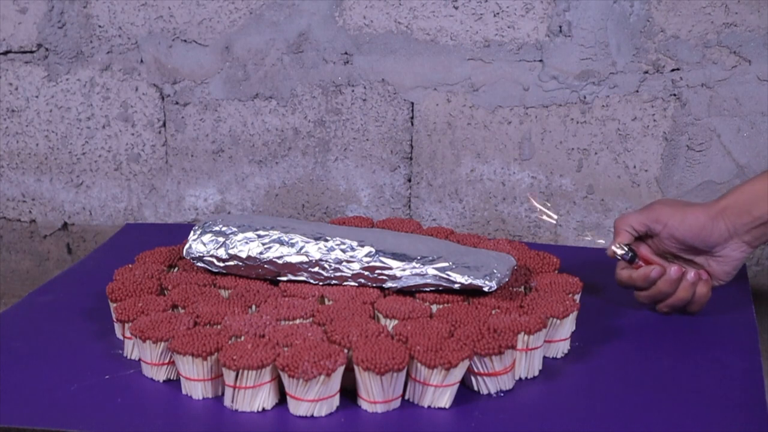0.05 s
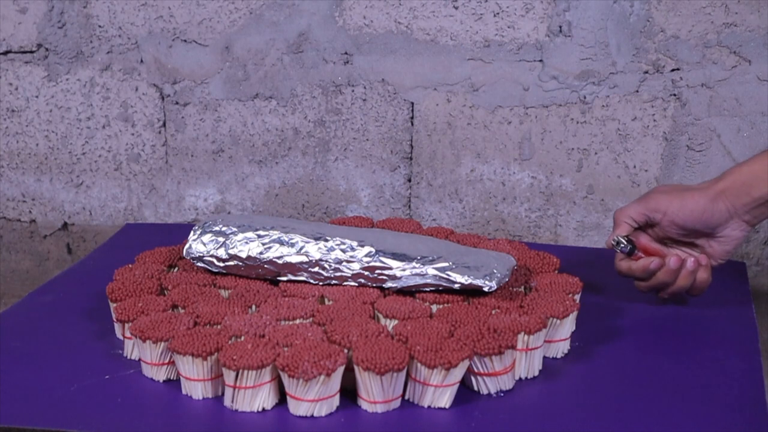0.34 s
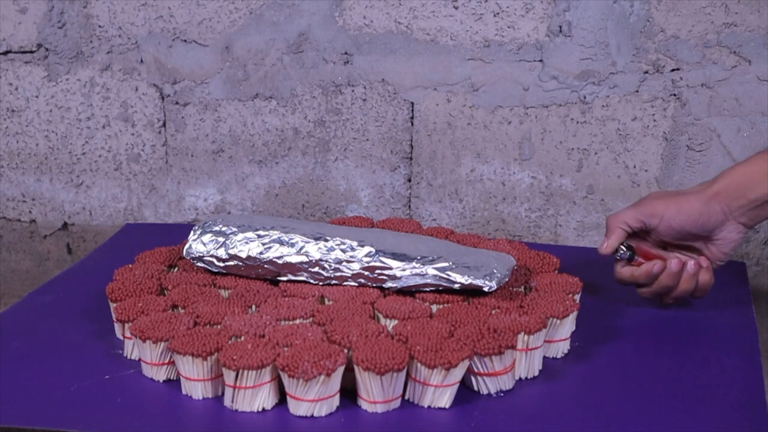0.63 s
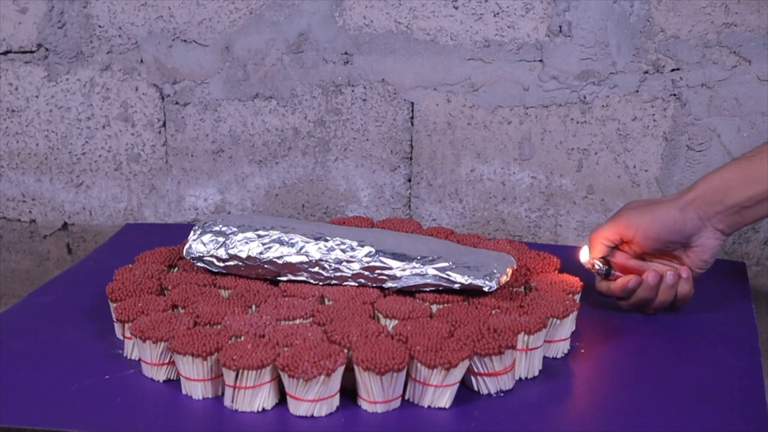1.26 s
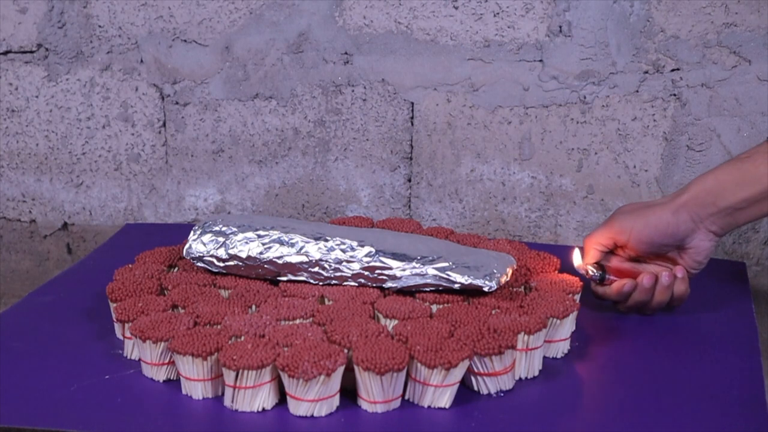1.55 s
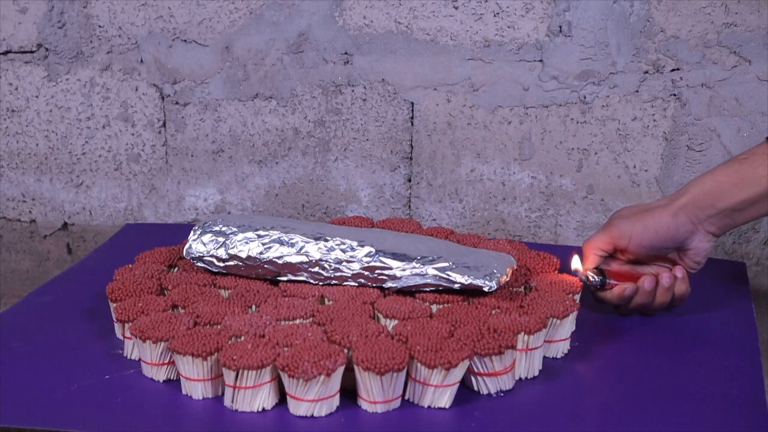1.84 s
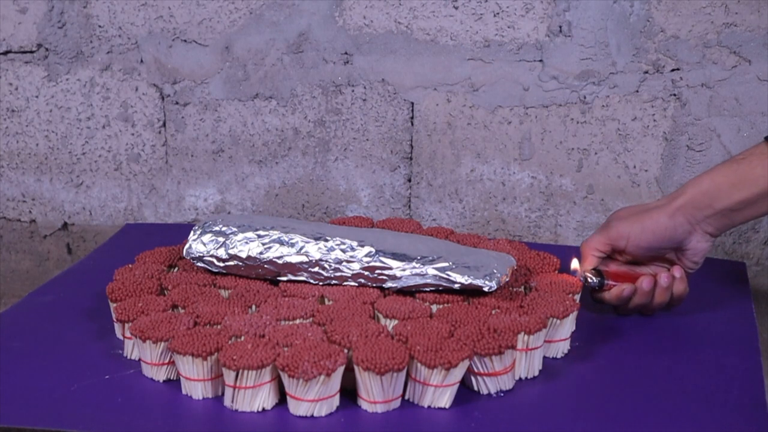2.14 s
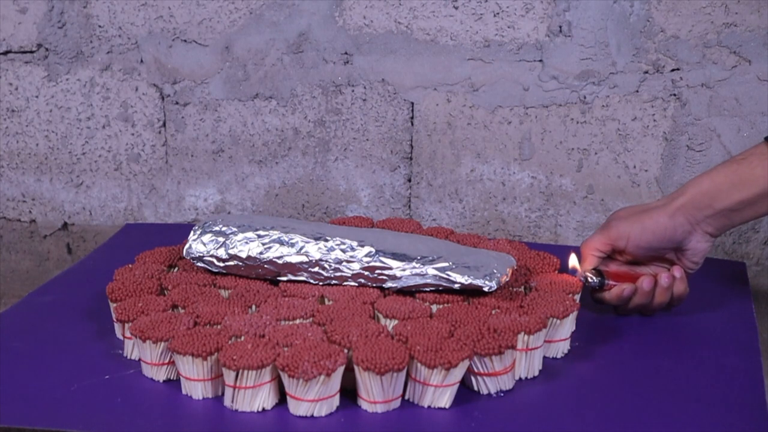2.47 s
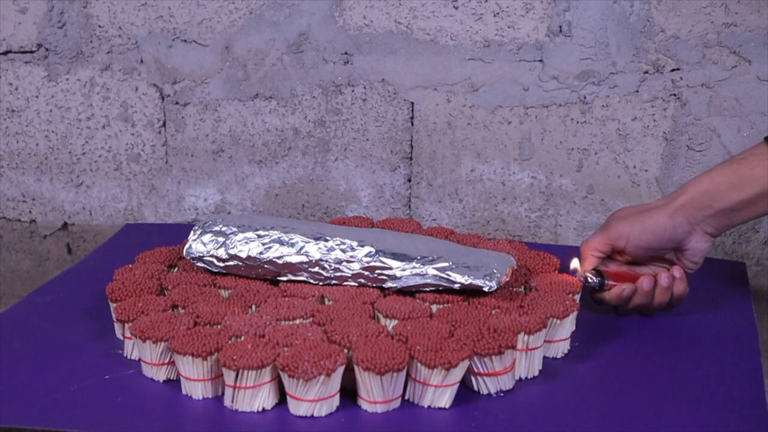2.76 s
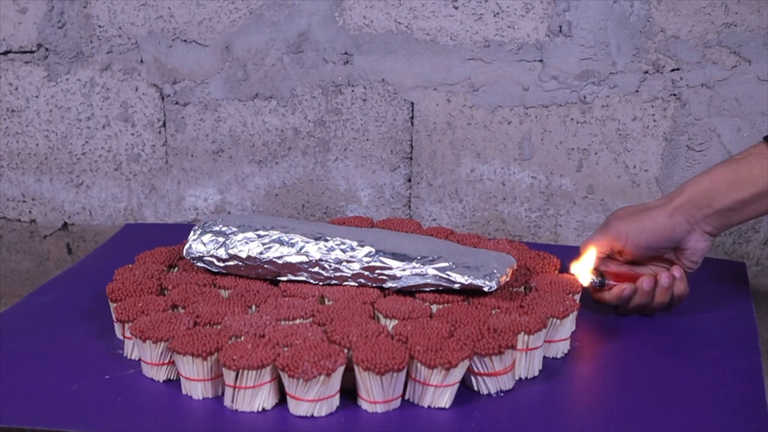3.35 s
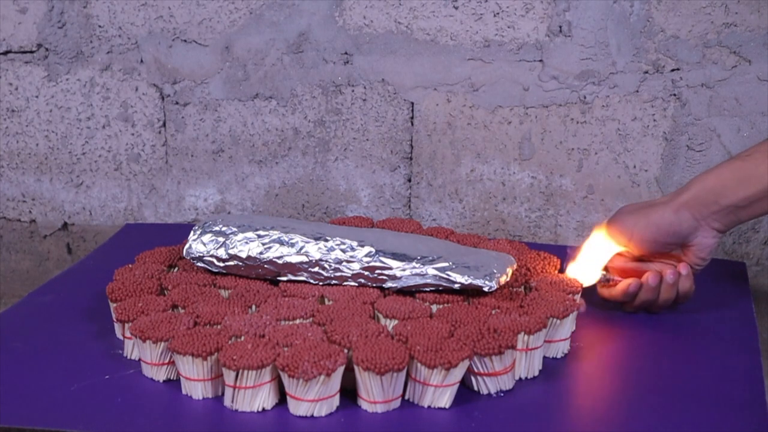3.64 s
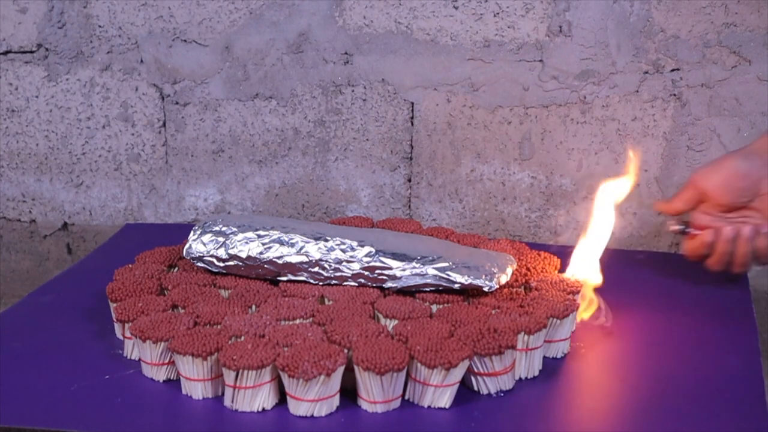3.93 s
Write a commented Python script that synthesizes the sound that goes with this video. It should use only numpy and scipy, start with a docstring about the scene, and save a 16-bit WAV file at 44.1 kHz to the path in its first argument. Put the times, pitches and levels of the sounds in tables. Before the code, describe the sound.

A flint lighter is struck with a short scratch right at the start and again at about 0.7 seconds, when its flame begins a soft hiss that fades by 2 seconds. From about 3 seconds, bundled matches catch in puffs, merging into a growing, sizzling flare until the end at 4 seconds. Muffled road noise and engines drone outside throughout, one easing off around 2 seconds as another picks up.

```python
"""Two scratchy strikes of a flint lighter sound in a bare masonry room, as its wheel scrapes the flint.
The second strike lights the gas, and the flame hisses softly. Held to a bundle of matches, it sets
the heads off in puffs that merge into a growing, sizzling flare. Behind the walls, over road noise,
two engines drone, one easing off as the other picks up with a faint whine."""
import sys
import numpy as np
from scipy import signal
from scipy.fft import rfft, irfft
from scipy.io import wavfile

SR = 44100
rng = np.random.default_rng(int(sys.argv[2]) if len(sys.argv) > 2 else 0)


def to_wav(s):
    """Save 16-bit WAV."""
    ch = np.atleast_2d(s).T  # columns
    pcm = np.round(np.clip(ch, -1, 1) * 32767)  # PCM
    wavfile.write(sys.argv[1], SR, pcm.astype(np.int16))


N = 176400
T = np.arange(N) / SR
FREQS = np.fft.rfftfreq(N, 1 / SR) + 1e-3

# room notes stirred by traffic (pitch [Hz], width [Hz], start level [dB], middle [dB], end [dB])
ROOM_BOOMS = [(60, 9.1, -61, -51.5, -51.5), (124, 25.4, -53, -46.5, -54.5), (159, 11, -54, -47.5, -50),
              (274.6, 8.5, -65.5, -56.5, -54), (339, 94, -53.5, -61, -60), (607, 61, -68, -63, -67.5),
              (843, 49, -59, -66.5, -76), (1135, 17, -79.5, -74.5, -69)]
# tone colours of the steady room rumble and the road (frequency [Hz], relative level [dB])
RUMBLE_COLOUR = [(13, -46), (22, 2.5), (64, -1), (92, 0), (163, -2.5), (239, -5), (275, -7), (403, -5.5),
                 (625, -13), (944, -23.5), (1080, -20.5), (1210, -26), (1730, -22.5), (2400, -44.5),
                 (15500, -55.5)]
TRAFFIC_COLOUR = [(150, 1.5), (320, -1.5), (520, -12.5), (850, -8.5), (1200, -8), (1700, -15), (2400, -20),
                  (5000, -46.5)]
# fading road noise, and a thin hiss that drops as the flame lights (time [s], level [dB])
TRAFFIC_LEVEL = [(0, -53.5), (.6, -53.5), (1.3, -55), (1.75, -57.5), (2.05, -59.5), (4, -59)]
AIR_LEVEL = [(0, -65.5), (.3, -67.5), (.65, -67), (.75, -76)]

# speed of the slow engine (time [s], firing rate [Hz])
SLOW_RATE = [(0, 30.0), (.3, 30), (.62, 30), (.85, 30.5), (1.05, 30.5), (1.3, 30.5), (1.75, 30.5),
             (1.9, 30)]
# its strong harmonics, tones at 2, 4, 5 and 6 times that rate (time [s], level [dB])
SLOW_2 = [(0, -49), (.25, -52), (.5, -59), (.72, -39.5), (1.0, -40), (1.55, -39.5), (2.0, -52.5),
          (2.4, -62), (3.0, -51), (4, -71)]
SLOW_4 = [(0, -37.5), (.2, -48.5), (.4, -43.5), (.8, -43), (1.5, -47.5), (2.0, -60), (2.5, -60)]
SLOW_5 = [(0, -41), (.3, -41), (.45, -46.5), (.8, -42.5), (1.03, -44.5), (1.72, -55), (2.1, -60)]
SLOW_6 = [(0, -30), (0.111, -34.5), (.26, -46), (.42, -43.5), (.52, -39.5), (.9, -42), (1.1, -49.5),
          (1.261, -37), (1.47, -45), (1.8, -38.5), (1.92, -60)]
# its weak harmonics (multiple of the firing rate, base level [dB])
SLOW_WEAK = [(1, -59), (7, -57), (9, -68), (10, -57), (11, -56), (12, -55), (14, -64)]
# the fade those weak ones share (time [s], gain [dB])
SLOW_FADE = [(0, -1), (1.75, 0.5), (1.95, -15), (4, -13)]
# speed and strength of the fast engine (time [s], firing rate [Hz], gain [dB])
FAST_RUN = [(1.7, 40.11, -12), (2.0, 39.86, 0), (2.3, 41.32, -3), (2.6, 40.64, -5.5), (2.9, 40.04, -1.5),
            (3.2, 40.8, 2), (3.55, 41.92, 0), (3.8, 42.86, -1.5), (4, 42.6, -19)]
# its harmonics (multiple of the firing rate, base level [dB])
FAST_HARMONICS = [(4, -52), (8, -52.5), (9, -56.5), (10, -66), (11, -63.5), (12, -68.5), (13, -68.5),
                  (14, -73), (15, -63), (16, -65.5), (17, -68.5), (18, -65), (28, -77.5)]
# its whine (time [s], pitch [Hz], level [dB])
FAST_WHINE = [(0, 609.6, -65), (.9, 618, -63), (1.6, 610.5, -59), (2.1, 613, -55.5), (2.4, 618.5, -59.5),
              (2.95, 610.5, -56.5), (3.2, 609.6, -55), (3.45, 610.8, -58.5), (3.7, 616.4, -54.5),
              (4, 622, -59.5)]

# hand rubs (time [s], half length [s], hiss level [dB], pitch [Hz], width [Hz], ring level [dB])
HAND_RUBS = [(0.054, 0.0027, -71, 8400, 1200, -76), (0.087, 0.0098, -66.5, 8400, 1400, -82),
             (0.14, 0.01, -72.5, 8250, 1400, -71), (0.662, 0.0085, -72, 11900, 1000, -65),
             (0.766, 0.015, -73, 6500, 5000, -76), (0.852, 0.021, -76, 6800, 5000, -64),
             (0.915, 0.011, -65, 3620, 350, -63), (0.984, 0.043, -82, 6000, 5500, -67.5),
             (1.331, 0.0099, -75, 5505, 4500, -70.5), (2.134, 0.033, -80, 3000, 900, -92),
             (2.234, 0.03, -81, 5000, 4500, -74.5)]
# notes of the hollow fist around the lighter (pitch [Hz], width [Hz], relative level [dB])
FIST_RINGS = [(2400, 430, 1.5), (3480, 480, -2), (5580, 510, -11), (7740, 800, -17.5)]
# lighter ticks and match pops (time [s], level [dB], pitch [Hz], width [Hz], decay [s])
TICKS_AND_POPS = [(0.0297, -54, 4830, 4500, 0.0011), (.075, -49, 9000, 9100, .0015),
                  (.438, -66.5, 8600, 5000, 0.0055), (.676, -51, 4200, 900, .003),
                  (.725, -65, 9500, 3000, .002), (1.452, -76, 12500, 4000, .003),
                  (2.146, -64.5, 2800, 200, .012), (3.063, -70, 6500, 5000, .003),
                  (3.364, -74, 13500, 4000, 0.0022), (3.734, -62, 8000, 5000, .002),
                  (3.784, -56, 10300, 7000, .0025), (3.914, -49.5, 3000, 1900, 0.0043)]
# hiss of the lighter flame (time [s], level [dB])
GAS_LEVEL = [(.69, -98), (.73, -68.5), (1.05, -68.5), (1.45, -69.5), (1.75, -74), (1.9, -82), (2.9, -105)]
# tone colour of that flame and of the thin hiss (frequency [Hz], relative level [dB])
SOFT_HISS_COLOUR = [(800, -5), (1800, 5), (3000, -1), (4200, -4), (6000, -11), (9000, -20), (15000, -32)]
# strikes of the wheel (time [s], level [dB], rasp length [s], hood pitch [Hz], hood level [dB])
WHEEL_STRIKES = [(0.064, -41, 0.0042, 4030, -54), (0.6885, -40, 0.0044, 3290, -43)]
# tone colour of the flint's rasp (frequency [Hz], relative level [dB])
FLINT_COLOUR = [(500, -15), (1400, 7), (2100, -6.5), (2900, 4), (4400, 2.5), (5900, -6), (6700, -2),
                (8700, 2), (10800, 0), (12600, -.5), (13700, -10), (16000, -10)]

# puffs of the flare (time [s], base levels of low rush [dB], middle hiss [dB], high sizzle [dB])
FLARE_LEVELS = [(2.954, -85, -86, -84), (2.974, -56, -68, -74), (3.002, -52, -74, -80),
                (3.012, -81, -78, -79), (3.026, -54, -79, -78), (3.044, -72, -81, -81),
                (3.06, -55, -70, -76), (3.098, -80, -80, -81), (3.152, -48.5, -61.5, -69),
                (3.226, -58, -68.5, -71.5), (3.382, -58, -68.5, -72), (3.398, -57.5, -68, -73),
                (3.474, -49, -60, -65), (3.522, -53.5, -65.5, -67), (3.67, -51, -66, -69.5),
                (3.742, -51, -59.5, -62), (3.86, -54, -63, -66), (4.0, -53.5, -63, -66.5)]
# tone colours of those three layers (frequency [Hz], relative level [dB])
RUSH_COLOUR = [(350, -12), (800, 2), (1150, 5.5), (1550, 0.5), (1900, 1), (2200, -6), (3000, -45)]
HISS_COLOUR = [(1700, -32), (2300, 7.5), (3000, 4), (3500, -0.5), (4300, 2), (5300, -2.5), (5900, -15),
               (7500, -35)]
SIZZLE_COLOUR = [(4800, -21), (6400, -1), (8300, 1.5), (10300, 1.5), (11800, -1.5), (13500, -11),
                 (16000, -13)]
# ringing peaks in the flare's hiss, coloured by the table and room
# (pitch [Hz], width [Hz], starting level against the hiss [dB])
FLARE_RINGS = [(1127.5, 37, -7), (1450, 55, 7), (3440, 310, -2), (3750, 86, -5), (5200, 350, -9)]
# finest fizz at the top of the flare (time [s], level [dB])
FIZZ_LEVEL = [(2.95, -93), (3.12, -89), (3.28, -82), (3.33, -89), (3.55, -80), (3.73, -77), (4, -85)]
# echoes off the bundles and the table: one list of (delay [s]), one of (relative level [dB])
ECHO_DELAYS = [.000585, .001709]
ECHO_LEVELS = [-14, -9.5]

TOP_HZ = 15750


def undb(db):
    """Turn decibels into a number to multiply by."""
    return 10 ** (np.asarray(db) / 20)


def unit(x):
    """Scale a signal to an average strength (rms) of 1."""
    return x / np.sqrt(np.mean(x ** 2))


def curve(rows, column=1):
    """Join one column of a table with straight lines over time."""
    rows = np.array(rows, float)
    return np.interp(T, rows[:, 0], rows[:, column])


def noise():
    """White noise: all frequencies, equally strong."""
    return rng.standard_normal(N)


def colour(x, points):
    """Give a sound a tone colour from (Hz, dB) points, fading away outside them."""
    hz, db = np.array(points, float).T
    edges = 1 / np.sqrt((1 + (hz[0] / FREQS / 1.5) ** 6) * (1 + (FREQS / hz[-1] / 1.5) ** 6))
    shape = undb(np.interp(np.log(FREQS), np.log(hz), db))
    return unit(irfft(rfft(x) * edges * shape, N))


def band(hz, width_hz):
    """Noise that rings around one pitch."""
    detune = (FREQS / hz - hz / FREQS) * hz / width_hz
    return unit(irfft(rfft(noise()) / (1 + .5 * detune ** 2), N))


def wobble(rate_hz):
    """A smooth random wobble, about 1 in size."""
    return unit(irfft(rfft(noise()) * np.exp(-(FREQS / rate_hz) ** 2), N))


def clicks(per_s, spread_db):
    """A dense shower of clicks of uneven size."""
    size = undb(spread_db * np.minimum(rng.exponential(size=N), 4))
    return unit((rng.random(N) < per_s / SR) * size * np.sign(noise()))


def burst(start, rise_s, fall_s, hold_s=0):
    """A loudness shape that swells up to its start time, holds and dies away."""
    return np.exp(np.minimum(T - start, 0) / rise_s - np.maximum(T - start - hold_s, 0) / fall_s)


def tone(hz, db, waver_db, waver_hz):
    """A pure tone whose level wavers."""
    phase = 2 * np.pi * (np.cumsum(hz) / SR + rng.random())
    return np.sqrt(2) * np.sin(phase) * undb(db + waver_db * wobble(waver_hz))


def background():
    """Traffic makes the room boom; road noise recedes over a thin hiss and a steady rumble."""
    times = [0, T[-1] / 2, T[-1]]
    booms = sum(undb(np.interp(T, times, db)) * band(hz, width) for hz, width, *db in ROOM_BOOMS)
    road = colour(noise(), TRAFFIC_COLOUR) * undb(curve(TRAFFIC_LEVEL))
    air = colour(noise(), SOFT_HISS_COLOUR) * undb(curve(AIR_LEVEL))
    rumble = undb(-46.5) * colour(noise(), RUMBLE_COLOUR)
    return booms + road + air + rumble


def slow_engine():
    """An engine eases off; only the low harmonics of its firing get through the walls."""
    rate = curve(SLOW_RATE) * (1 + 0.0039 * wobble(11.7))
    strong = sum(tone(k * rate, curve(levels), waver_db=1.4, waver_hz=9.1)
                 for k, levels in [(2, SLOW_2), (4, SLOW_4), (5, SLOW_5), (6, SLOW_6)])
    weak = sum(tone(k * rate, db + curve(SLOW_FADE), waver_db=3, waver_hz=15.3) for k, db in SLOW_WEAK)
    return strong + weak


def fast_engine():
    """A faster engine picks up behind the walls, with low harmonics and a faint whine."""
    rate = curve(FAST_RUN) * (1 + 0.0016 * wobble(8.67))
    gain_db = curve(FAST_RUN, column=2)
    drone = sum(tone(k * rate, db + gain_db, waver_db=2.5, waver_hz=11) for k, db in FAST_HARMONICS)
    whine_hz = curve(FAST_WHINE) * (1 + 0.0039 * wobble(20.7))
    return drone + tone(whine_hz, curve(FAST_WHINE, column=2), waver_db=-1, waver_hz=14)


def room(x):
    """The bare walls throw sound back as a short, duller tail."""
    fade_s, dull_above_hz, echo_db = 0.21, 8100, -12
    tail = noise() * undb(-60 * T / fade_s) * (T > .004)
    spectrum = rfft(tail / np.sqrt(np.sum(tail ** 2)))
    dull_tail = irfft(spectrum / np.sqrt(1 + (FREQS / dull_above_hz) ** 4), N)[:SR]
    return x + undb(echo_db) * signal.fftconvolve(x, dull_tail)[:N]


def rubs():
    """The hand rubs softly on the lighter, and the hollow of the fist rings."""
    fist = sum(undb(db) * band(hz, width) for hz, width, db in FIST_RINGS)
    out = 0
    for time, half_length, db, hz, width, ring_db in HAND_RUBS:
        swell = np.exp(-.5 * ((T - time) / half_length) ** 2)
        out += (undb(db) * band(hz, width) + undb(ring_db) * fist) * swell
    return out * undb(1.9 * wobble(120))


def ticks():
    """The lighter ticks and match heads pop, each a tiny burst of noise."""
    return sum(undb(db) * band(hz, width) * burst(time, rise_s=0.00033, fall_s=decay)
               for time, db, hz, width, decay in TICKS_AND_POPS)


def gas_flame():
    """Burning gas hisses softly, with a slight flutter."""
    return colour(noise(), SOFT_HISS_COLOUR) * undb(curve(GAS_LEVEL) + 1.2 * wobble(25))


def lighter():
    """The wheel scrapes and sings, then its teeth tear across the flint and the metal hood rings."""
    fall_s, scrape_lead_s = 0.0032, 0.02
    teeth = undb(-3) * clicks(per_s=8800, spread_db=4.5)
    rasp = colour(noise() + teeth, FLINT_COLOUR)
    wheel = band(12600, width_hz=730)
    out = 0
    for start, db, length, hood_hz, hood_db in WHEEL_STRIKES:
        scrape = undb(-10.5) * burst(start, 0.011, fall_s) * (T > start - scrape_lead_s)
        sing = undb(-16) * burst(start, 0.0097, fall_s)
        tear = burst(start, 0.00078, fall_s, hold_s=length)
        hood = undb(hood_db) * band(hood_hz, width_hz=320)
        out += (undb(db) * rasp + hood) * np.maximum(tear, scrape) + undb(db) * wheel * sing
    return out


def near_echoes(x):
    """Echoes off nearby surfaces strengthen some frequencies and weaken others."""
    paths = 1 + sum(undb(db) * np.exp(-2j * np.pi * FREQS * delay)
                    for delay, db in zip(ECHO_DELAYS, ECHO_LEVELS))
    return irfft(rfft(x) * paths / np.sqrt(np.mean(np.abs(paths) ** 2)), N)


def spurt(x):
    """Eight frequency ranges each swell and sink at random, as when single heads take fire."""
    centres_hz = np.geomspace(1500, TOP_HZ, 8)
    shares = [np.interp(FREQS, centres_hz, row) for row in np.eye(len(centres_hz))]
    return sum(irfft(rfft(x) * share, N) * undb(1.1 * wobble(12)) for share in shares)


def matches():
    """Match heads catch in puffs that rush, hiss and sputter, brightening as the flame grows."""
    start, catch_s, ring_fade_db_per_s = FLARE_LEVELS[0][0], 0.022, 10
    burning_s = np.maximum(T - start, 0)
    rings = sum(undb(db) * band(hz, width) for hz, width, db in FLARE_RINGS)
    # the ringing peaks fade against the hiss as the flare grows
    flare = rings * undb(curve(FLARE_LEVELS, column=2) - ring_fade_db_per_s * burning_s)
    crackle = undb(-6) * clicks(per_s=470, spread_db=2.5)
    for column, points, gain_db in [(1, RUSH_COLOUR, -1.5), (2, HISS_COLOUR, -.3),
                                    (3, SIZZLE_COLOUR, -.5)]:
        flare += colour(noise() + crackle, points) * undb(gain_db + curve(FLARE_LEVELS, column))
    treble = irfft(rfft(flare) / (1 + (9520 / FREQS) ** 12), N)
    flare -= 0.48 * np.exp(-burning_s / .4) * treble  # the first puffs are duller
    flare += band(13700, width_hz=2800) * undb(curve(FIZZ_LEVEL))
    flutter = undb(0.66 * wobble(70))
    fade_in = np.clip((T - start) / catch_s + 1, 0, 1)
    return near_echoes(spurt(flare) * flutter * fade_in)


def scene():
    """The lighter and matches in the room, over the drone from outside, in one channel."""
    near = room(lighter() + ticks() + rubs() + gas_flame() + matches())
    return (near + slow_engine() + fast_engine() + background())[None]


def record(dry):
    """Cut away the very highest treble."""
    return signal.sosfilt(signal.ellip(10, .2, 70, TOP_HZ, fs=SR, output="sos"), dry)


dry = scene()
out = record(dry)
to_wav(out)
```